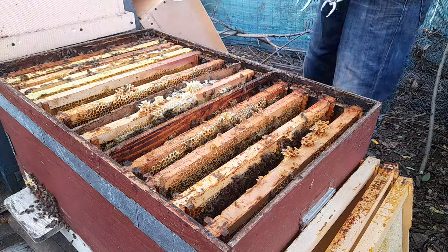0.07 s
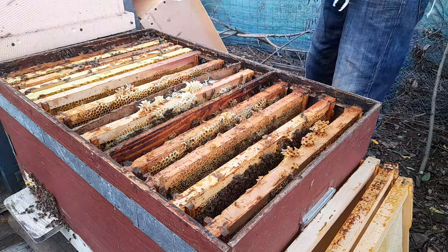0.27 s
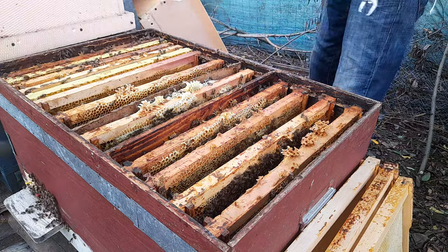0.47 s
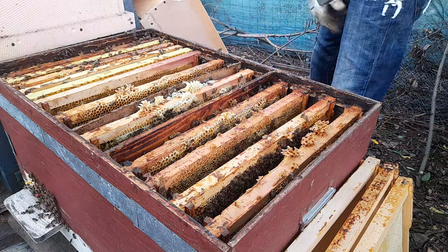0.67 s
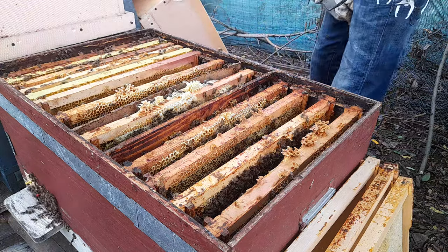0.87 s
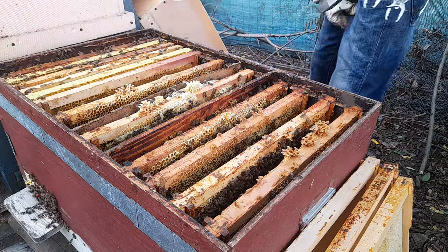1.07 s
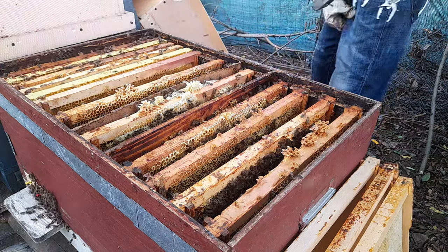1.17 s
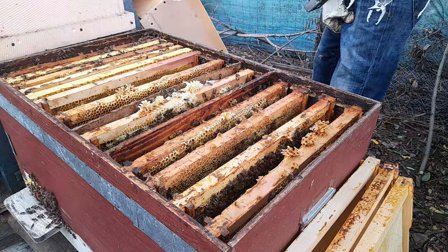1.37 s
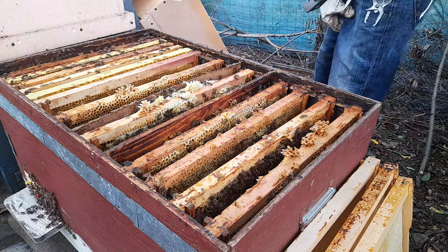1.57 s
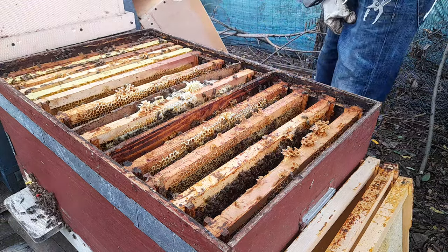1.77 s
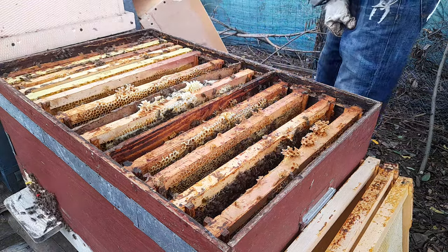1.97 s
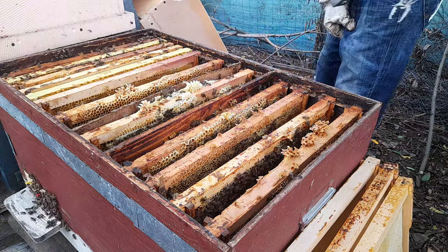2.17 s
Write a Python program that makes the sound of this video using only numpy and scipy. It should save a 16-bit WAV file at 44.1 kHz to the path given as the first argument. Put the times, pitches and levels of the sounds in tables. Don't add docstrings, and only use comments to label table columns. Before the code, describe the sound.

Outdoors by an open hive, one bee's wings slap the near left microphone in a short overloaded buzz after light wood knocks; it fades quickly to a soft swarm hum, a faint passing bee and far chirps.

```python
import sys
import numpy as np
from scipy import signal
from scipy.io import wavfile

SR = 44100
rng = np.random.default_rng(int(sys.argv[2]) if len(sys.argv) > 2 else 0)


def dump(signal):
    limited = np.clip(np.atleast_2d(signal).T, -1, 1)
    pcm = np.round(limited * 32767).astype(np.int16)
    wavfile.write(sys.argv[1], SR, pcm)


def voltage_ratio(level):
    return 10 ** (np.asarray(level, float) / 20)


N = 97020
T = np.arange(N) / SR


def rms_one(x):
    return x / np.sqrt(np.mean(x ** 2) + 1e-20)


def in_time(rows):
    s, *columns = np.transpose(rows)
    return [np.interp(T, s, column) for column in columns]


def at_hz(points, hz):
    f, value = np.transpose(points)
    return np.interp(np.log(hz), np.log(f), value)


def drift(rate_hz):
    every = 40
    r = np.exp(-2 * np.pi * every * rate_hz / SR)
    noise = rng.standard_normal(N // every + 2002)
    slow = signal.lfilter([1], [1, -2 * r, r * r], noise)[2000:]
    return np.interp(np.arange(N) / every, np.arange(len(slow)), rms_one(slow))


def ring(clicks, hz, t60):
    r, w = voltage_ratio(-60 / (t60 * SR)), 2 * np.pi * hz / SR
    return signal.lfilter([0, np.sin(w)], [1, -2 * r * np.cos(w), r * r], clicks + 1e-18)


def low(x, hz, order=2):
    return signal.sosfilt(signal.butter(order, hz, fs=SR, output="sos"), x)


def band(x, low_hz, high_hz, order=2):
    return signal.sosfilt(signal.butter(order, [low_hz, high_hz], "band", fs=SR, output="sos"), x)


def port(x):
    return low(x, 5720, order=6) + voltage_ratio(-8.5) * band(x, 10800, 15200, order=3)


def near_bee():
    # t/s, wingbeat f/Hz, fundamental level/dB, overtone level/dB,
    # extra level of the upper overtones/dB
    flight = [
        [(0.0, 206, -36.5, -42, -1.5), (0.012, 217, -41.5, -45.5, -4), (0.03, 208.7, -53, -42, -2),
         (0.064, 220.8, -43.5, -46, -2.5), (0.082, 215, -42, -46.5, -1.5), (0.1, 213.4, -61, -43, -4),
         (0.126, 228.4, -70.5, -43.5, 0), (0.165, 221.7, -63.5, -44.5, -6), (0.175, 224.5, -51, -41, 0)],
        [(0.185, 230.7, -34.5, -41, -4.5), (0.206, 236.5, -16.5, -29, 2.5), (0.214, 225.9, -7, -21.5, 5.5),
         (0.226, 241.4, -32, -14.5, 0), (0.234, 232.7, -12.5, -33, 4), (0.244, 233.2, -22.5, -28, 6.5),
         (0.251, 209.4, -32.5, -36, -3.5), (0.266, 202.5, -36.5, -45, -4)],
        [(0.276, 215.1, -34, -41.5, -0.5), (0.292, 220.1, -42, -53.5, -0.5), (0.314, 219.4, -48.5, -52.5, -3.5),
         (0.35, 219.8, -53, -61.5, -3.5), (0.368, 227, -55.5, -66.5, 7), (0.408, 225.6, -50, -57, -10.5),
         (0.43, 201.3, -64.5, -66.5, 2), (0.452, 218.2, -70.5, -107, 7), (0.56, 200.8, -75, -84, -2)],
    ]
    hz, first_db, rest_db, bright_db = in_time([row for stage in flight for row in stage])
    fade = np.clip((flight[-1][-1][0] - T) * 20, 0, 1)
    turns = np.cumsum(hz * (1 + .0015 * drift(49))) / SR
    turns = turns - turns[int(.2214 * SR)]
    stroke = turns % 1

    hum = fade * wing_hum(turns, first_db, rest_db, bright_db)
    high_pass = signal.butter(2, 3300, "high", fs=SR, output="sos")
    airy = signal.sosfilt(high_pass, rng.standard_normal(N))
    wing_hiss = voltage_ratio(rest_db - 18.5) * fade * np.exp(-stroke / .3) * airy
    pressure = hum + wing_slaps(stroke) + wing_hiss + wing_puff()
    top = .86
    return hum, port(pressure / (1 + (pressure / top) ** 4) ** (1 / 4))


def wing_hum(turns, first_db, rest_db, bright_db):
    # multiple of the wingbeat, level facing us/dB, level turned away/dB
    overtones = [(2, 1, 4), (3, -12.5, -9), (4, -13, -7.5), (5, -8.5, -8.5), (6, -18, -12.5), (7, -23, -17),
                 (8, -25, -17.5), (9, -29, -25), (10, -22, -28), (11, -28.5, -32), (12, -29, -27.5),
                 (13, -34.5, -34.5), (14, -36, -38), (15, -38.5, -36.5), (16, -35.5, -38)]
    turned = np.clip((T - .245) / .02, 0, 1)
    rest = 0
    for k, facing_db, away_db in overtones:
        flutter_db = 2.0 * drift(11)
        level_db = facing_db + turned * (away_db - facing_db) + (k > 2) * (bright_db + flutter_db)
        rest = rest - voltage_ratio(level_db) * np.sin(2 * np.pi * k * turns)
    first = np.sin(2 * np.pi * turns - np.pi)
    return 2 * np.sqrt(2) * (voltage_ratio(first_db) * first + voltage_ratio(rest_db) * rest)


def wing_slaps(stroke):
    # t/s, edge level/dB, spike level/dB, spike lag in strokes (0-1)
    contacts = [
        (.195, -66, -63, 0.4),
        (.215, -23.5, -35.5, 0.6),
        (.223, -3, -13, .32),
        (.227, -3.5, -2.5, 0.05),
        (.232, -1.5, 0, .2),
        (.24, -7, 5, .26),
        (.245, -17, -3, 0.34),
        (.25, -31, -4, .44),
        (.255, -38.5, -4, .48),
        (.262, -69.5, -61, 0.8),
    ]
    edge_db, spike_db, lag = in_time(contacts)
    brushing = (edge_db > contacts[0][1]) & (edge_db > contacts[-1][1])
    new_stroke = np.diff(stroke, prepend=0) < 0
    edge = -ring(voltage_ratio(edge_db) * new_stroke * brushing, 1900, .0022)
    spike_width = lag * .1 * np.where(stroke > lag, 1.3, .7)
    spike = voltage_ratio(spike_db) / (1 + ((stroke - lag) / spike_width) ** 2)
    hiss = voltage_ratio(edge_db - 2) * np.exp(-stroke / .16) * rng.standard_normal(N)
    slap = edge + (spike + hiss) * brushing
    return low(slap, 4500, order=1) + voltage_ratio(-10.5) * slap


def wing_puff():
    breeze = rng.standard_normal(N)
    puff = 0
    for length_s, cut_hz, db in ((.062, 142, -21), (.095, 62, -33)):
        swell = np.sin(np.pi * np.clip((T - .205) / length_s, 0, 1)) ** 2
        puff = puff + voltage_ratio(db) * swell * rms_one(low(breeze, cut_hz, order=4))
    return puff


def taps():
    # t/s, peak level/dB
    knocks = [
        (0.073, -24.5),
        (0.082, -33.5),
        (0.092, -38.5),
        (.135, -41),
        (0.173, -42.5),
        (0.494, -68),
    ]
    # f/Hz, level/dB, time to fall by 60 dB/s
    wood = [(1200, -34, .015), (1550, -40, .012), (2350, -30, .04), (3700, -40, .01), (4700, -36, .015),
            (5700, -40, .01)]
    s, db = np.transpose(knocks)
    clicks = np.zeros(N)
    clicks[(s * SR).astype(int)] = voltage_ratio(db)

    def fading(tau_s):
        return signal.lfilter([1], [1, -np.exp(-1 / (tau_s * SR))], clicks)

    crack = (fading(.002) + voltage_ratio(-7) * fading(.015)) * rng.standard_normal(N)
    out = voltage_ratio(-2.5) * port(crack - low(crack, 790, order=1))
    for hz, level_db, t60 in wood:
        out = out + voltage_ratio(level_db) * ring(crack + 4.0 * clicks, hz, t60)
    return np.array([out, voltage_ratio(-2.5) * low(out, 1800)])


def far_bees():
    # t/s, wingbeat f/Hz, level/dB, extra level of every fifth partial/dB
    passing = [(.6, 213, -92, 17), (.72, 210.4, -89, 20), (.78, 213.1, -92, 29), (.83, 217.4, -93.5, 30),
               (.9, 208, -79, 18), (.96, 220.9, -64, 5.5), (1.0, 222.3, -72, 9), (1.06, 216.3, -94.5, 4.5),
               (1.18, 215.3, -91.5, 16), (1.27, 198.9, -90, 23), (1.35, 200, -99, 14),
               (1.5, 196, -93.5, 27), (1.6, 192.5, -86, 26), (1.66, 199, -99, 20)]
    hz, db, fifth_db = in_time(passing)
    turns = np.cumsum(hz * (1 + 0.008 * drift(25))) / SR
    hum = 0
    for k in range(1, 11):
        partial_db = -7 * np.log2(k) + fifth_db * (k % 5 == 0) - 4.5 * (k == 10)
        hum = hum + voltage_ratio(partial_db) * np.sin(2 * np.pi * k * turns)
    return voltage_ratio(db) * hum * voltage_ratio(np.array([[6], [-5]]))


def birds():
    # t/s, length/s, starting f/Hz, ending f/Hz, level/dB
    chirps = [(0.575, .05, 4150, 3700, -72), (0.635, .04, 2950, 3100, -74), (0.7, 0.045, 4750, 4500, -74.5),
              (0.722, .04, 3750, 3350, -73.5), (.765, .04, 3700, 3470, -77), (0.802, .05, 3400, 2885, -74),
              (.83, 0.024, 3020, 2780, -81), (1.761, 0.039, 2700, 2680, -75), (1.814, .04, 5050, 4620, -76),
              (1.933, 0.055, 2610, 2425, -77), (1.84, 0.0515, 4000, 3510, -69),
              (1.9, 0.06, 4600, 4070, -66), (1.941, 0.057, 3500, 3240, -68), (2.0, 0.04, 3550, 3400, -75)]
    roughness = np.where(T < 1.2, .8, 2.0)
    blur = 1 + roughness * rms_one(low(rng.standard_normal(N), 420))
    out = np.zeros(N)
    for s, length, from_hz, to_hz, db in chirps:
        u = np.clip((T - s) / length, 0, 1)
        turns = np.cumsum(from_hz + (to_hz - from_hz) * u) / SR
        out += voltage_ratio(db) * np.sin(np.pi * u) * np.sin(2 * np.pi * turns)
    trill = 1 + 1.2 * np.sin(2 * np.pi * 340 * T) * (T > .69) * (T < .82)
    out = out * blur * trill
    echo = sum(voltage_ratio(-7.0 * k) * np.roll(out, int(0.017 * k * SR)) for k in range(1, 5))
    return (out + echo) * voltage_ratio(np.array([[0], [-34]]))


def swarm(count=14):
    # multiple of the wingbeat, level/dB
    partials = [(1, -8), (2, 2.5), (3, -15.5), (4, -14), (5, -11), (6, -12), (7, -17)]
    wingbeats = np.resize([200, 250], count) * np.geomspace(1 - .08, 1 + .08, count)
    out = 0
    for hz, side in zip(wingbeats, rng.normal(0, 1, count)):
        turns = np.cumsum(hz * (1 + .018 * drift(1.8))) / SR + rng.random()
        swell = voltage_ratio(5.5 * drift(6))
        hum = swell * sum(voltage_ratio(db) * np.sin(2 * np.pi * k * turns) for k, db in partials)
        out = out + hum * voltage_ratio(np.array([[1], [-1]]) * (2.5 + 1.5 * side))
    return voltage_ratio(-67) * rms_one(out)


def air():
    # f/Hz, level/dB (per Hz)
    spectrum = [(30, -21.5), (100, -14), (430, -7.5), (900, -14.5), (5900, -26), (8300, -50), (12000, -29),
                (15800, -33)]
    # f/Hz, left minus right level/dB
    lean = [(60, -3.5), (150, 0.5), (380, 4.5), (950, 2), (2380, 23.5), (5980, 32), (15000, 4)]
    # f/Hz, likeness (0-1)
    likeness = [(60, 0.053), (640, 0.4), (1400, 0.01), (15000, 0.06)]
    edges = 30 * 2 ** np.arange(0, 9.4, 1 / 3)
    white = rng.standard_normal((2, 2, N))
    out = 0
    for k, (lo, hi) in enumerate(zip(edges, edges[1:])):
        mid, side = band(white[k % 2], lo, hi)
        hz = np.sqrt(lo * hi)
        alike = np.clip(at_hz(likeness, hz), 0, 1)
        level_db = at_hz(spectrum, hz) + .6 * drift(8)
        gain = voltage_ratio(level_db - np.array([[0], [1]]) * at_hz(lean, hz))
        out = out + gain * (np.sqrt(1 + alike) * mid + np.sqrt(1 - alike) * side * [[1], [-1]])
    return voltage_ratio(-69) * rms_one(out)


def gusts():
    # t/s, level/dB
    wind = [
        (0, -76),
        (.04, -72),
        (.3, -80.5),
        (1.4, -99.5),
        (1.6, -78.5),
        (1.8, -76),
        (2.0, -80),
        (2.2, -77),
    ]
    db, = in_time(wind)
    return voltage_ratio(db + 4.8 * drift(16)) * rms_one(low(rng.standard_normal((2, N)), 240))


def scene():
    # t/s, level of both sides/dB, extra level on the left/dB
    auto_gain = [(0, 14.5, 7), (.1, 12, 4.5), (.2, 6, 18), (.225, -9, 26), (.33, 2, 6), (.45, 0.5, 4),
                 (.6, -2.5, 3), (1.0, -3, 3), (1.35, -1.5, 1), (1.5, 0.5, 3), (1.65, 7.5, -1.5),
                 (2.0, 5.5, 4), (2.2, 8, 0)]
    # t/s, level/dB
    swarm_level = [
        (0, -1),
        (.5, -0.5),
        (.9, 1),
        (1.2, -1),
        (1.5, -1),
        (1.62, 1),
        (1.75, -3.5),
        (1.95, 1.5),
        (2.2, -0.5),
    ]
    both_db, left_db = in_time(auto_gain)
    swarm_db, = in_time(swarm_level)
    hum, brush = near_bee()
    ducked_db = np.clip(both_db - auto_gain[2][1], -99, 0) * 4.0
    far_hum = np.roll(low(hum, 1500), 9)
    near = np.array([brush, far_hum * voltage_ratio(ducked_db - 22) * (T < .19)])
    background = voltage_ratio(both_db + swarm_db) * swarm() + voltage_ratio(np.array([both_db + left_db, both_db])) * air()
    return background + gusts() + near + taps() + birds() + far_bees()


def roll_off(x):
    return signal.sosfilt(signal.butter(12, 15790, fs=SR, output="sos"), x)


def record(dry):
    cut = signal.sosfilt(signal.butter(5, 48, "high", fs=SR, output="sos"), dry)
    return roll_off(np.clip(cut, -.995, .995))


dry = scene()
out = record(dry)
dump(out)
```